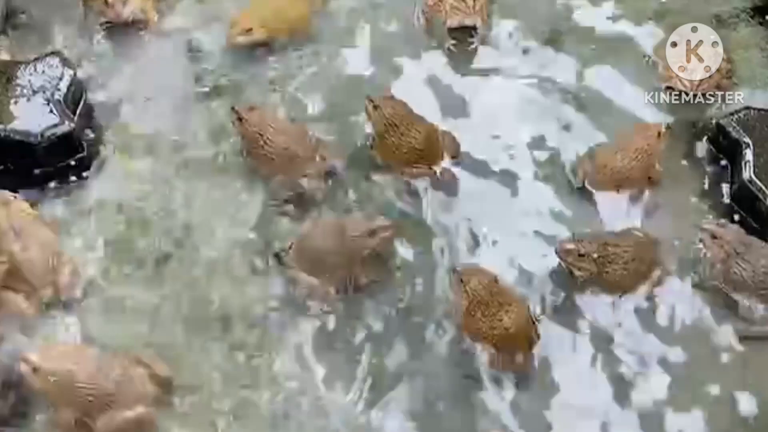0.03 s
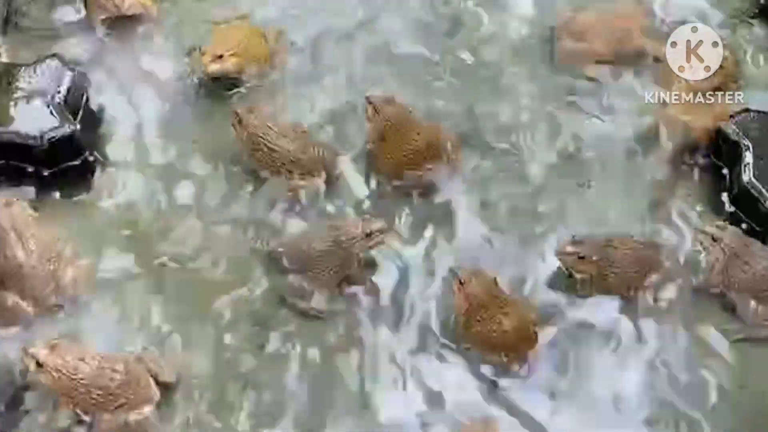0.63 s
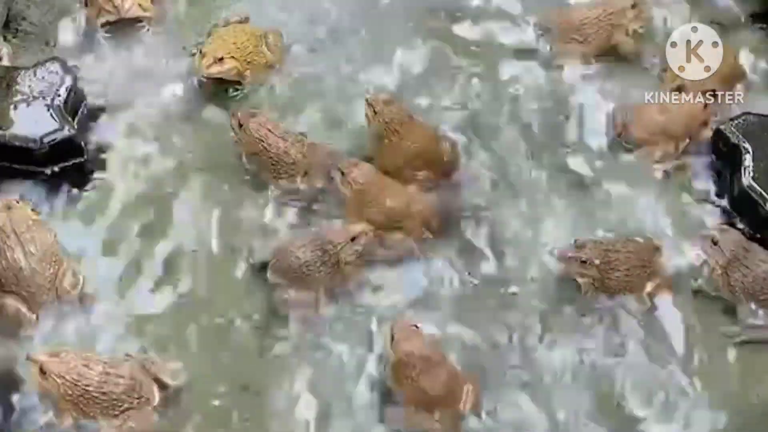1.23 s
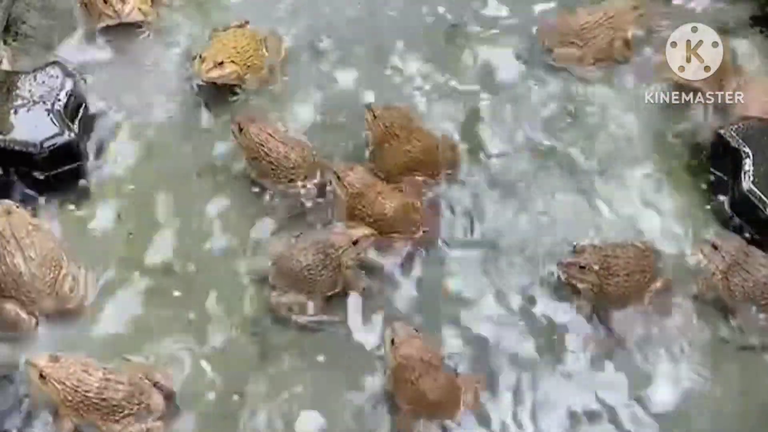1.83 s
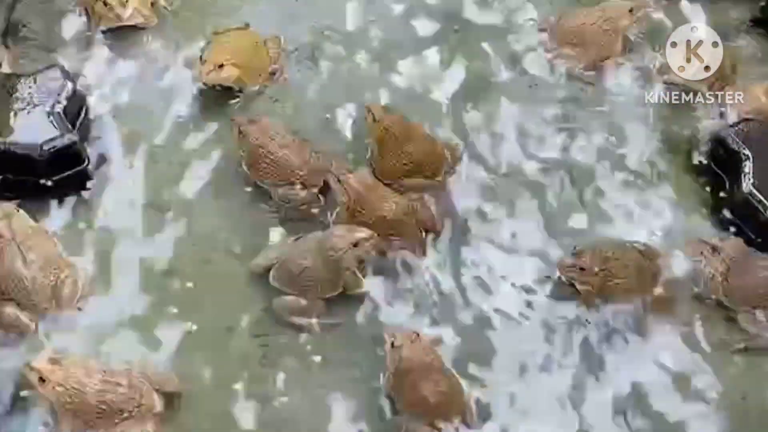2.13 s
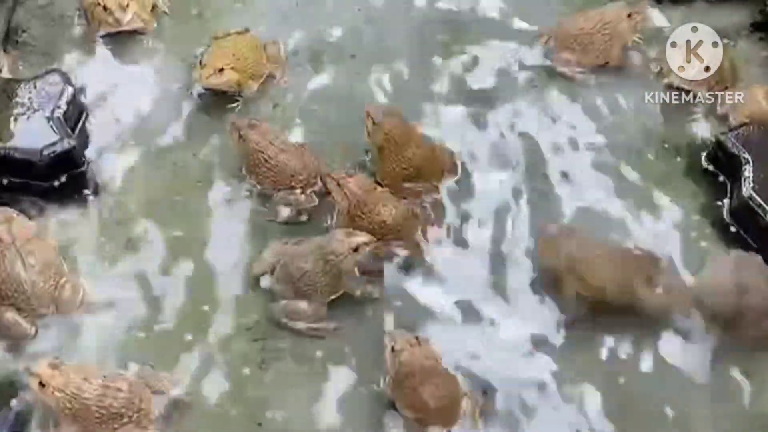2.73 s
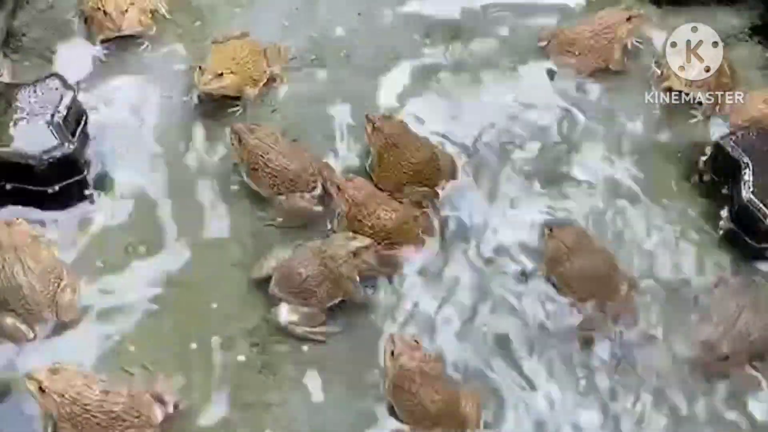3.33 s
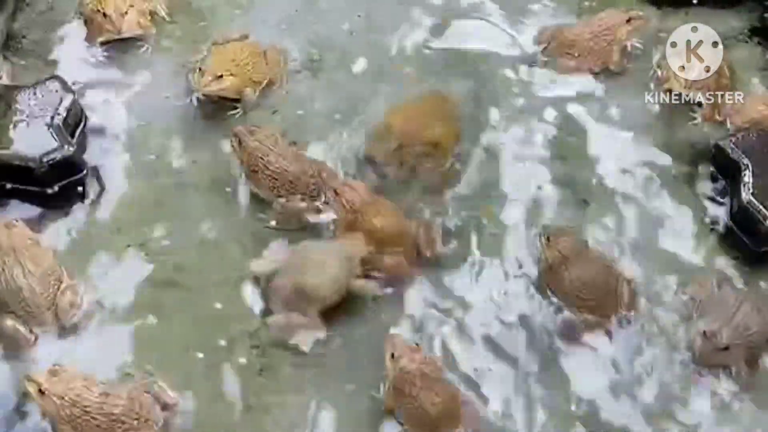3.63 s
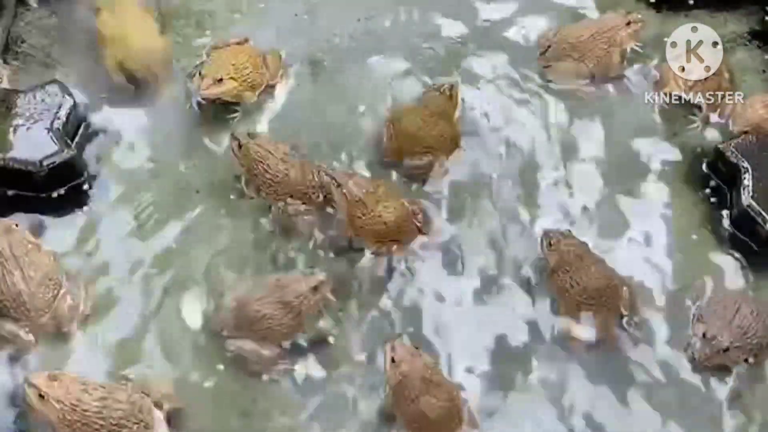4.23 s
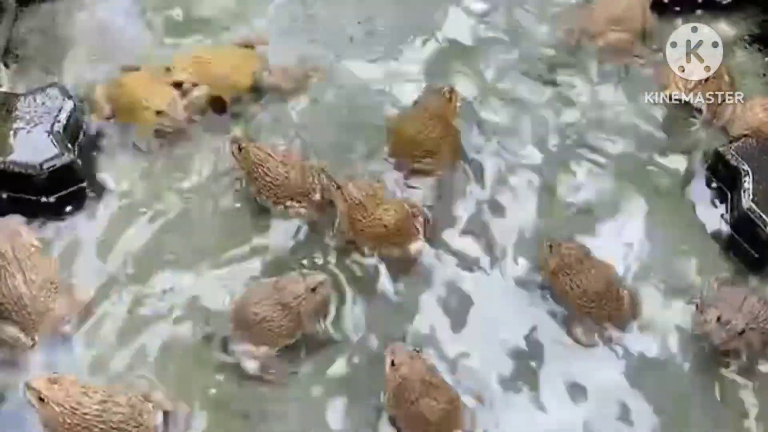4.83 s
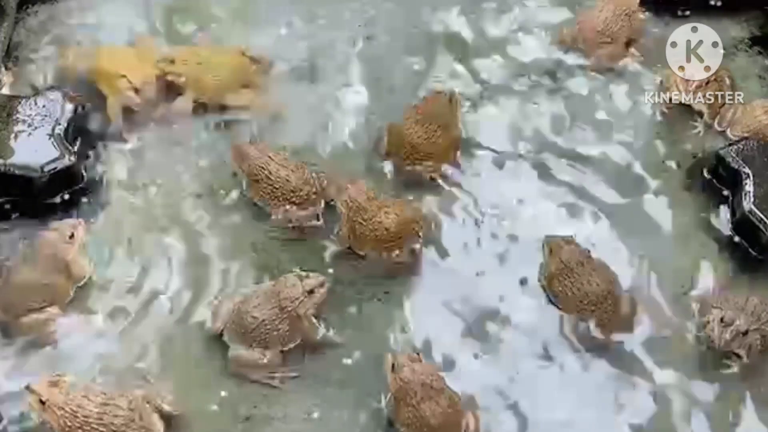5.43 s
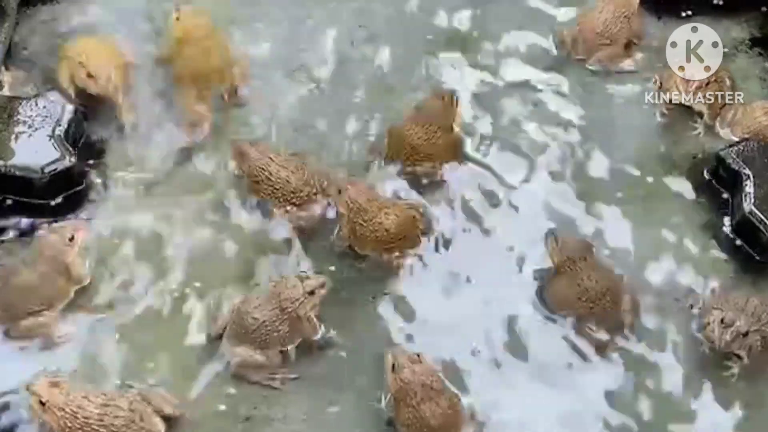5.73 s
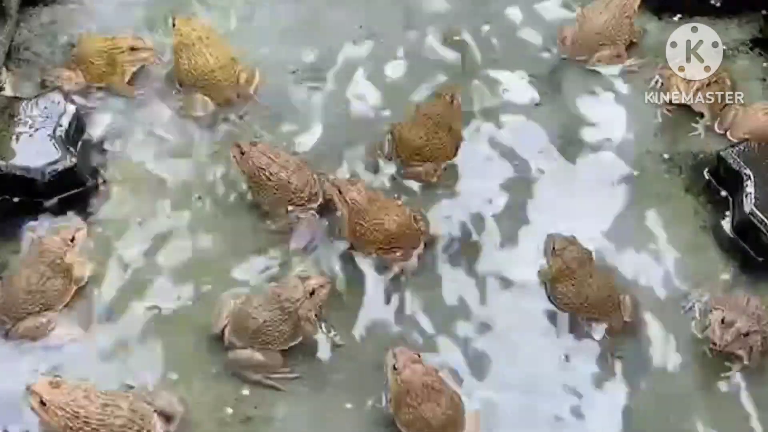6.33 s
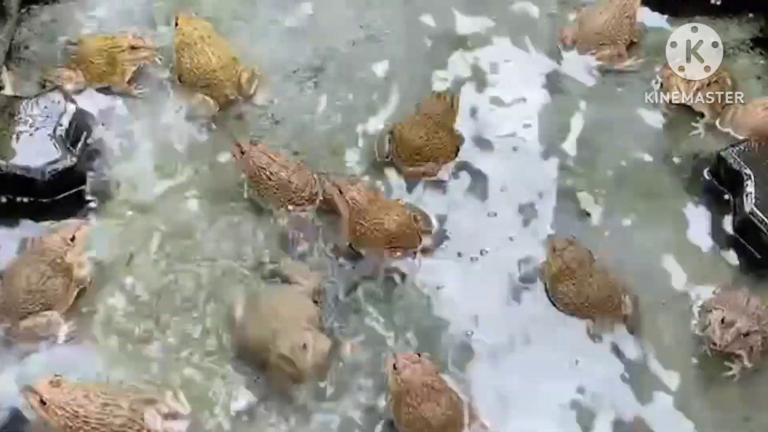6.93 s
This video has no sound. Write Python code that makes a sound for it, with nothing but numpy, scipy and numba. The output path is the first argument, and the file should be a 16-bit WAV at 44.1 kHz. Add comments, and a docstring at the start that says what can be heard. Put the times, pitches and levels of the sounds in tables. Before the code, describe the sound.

Frogs hop and paddle in a shallow pool, making close, uneven splashes with a short echo from the walls. The first second is busy with sloshing, bubbling and bright plinks, with flat belly smacks at about 0.4 and 1.1 seconds. The water eases into trickling, then a sharp plink at 2.3 seconds starts another flurry, peaking near 2.9. More splashes come at 3.7 and from 4.2 to 4.9 seconds. Gentle ripples and small drips follow, until fresh splashing and a brief gurgle between 6.5 and 7 seconds.

Underneath, a low throbbing rumble swells around 1 second, from 2.4 to 3.4 seconds and again at 6. Airy noise and a steady drone fade slightly throughout. A soft, muffled double knock, perhaps from a pump, repeats about every second and a half.

```python
"""Frogs hop and paddle in a shallow walled pool. Each kick or landing stirs up a cloud of
ringing bubbles and fine spray that soon settles. Bellies smack, drops plink, air pockets gulp
and hollows gurgle, and the pool walls add a short echo. Underneath are a low rumble that swells
now and then, airy noise, a steady drone and a soft double knock, perhaps of a pump."""
import sys
import numpy as np
from scipy import signal
from scipy.fft import rfft, irfft
from scipy.io import wavfile
from scipy.ndimage import uniform_filter1d
from numba import njit

SR = 44100
rng = np.random.default_rng(int(sys.argv[2]) if len(sys.argv) > 2 else 0)


def pcm_store(signal):
    """Save signal as 16-bit PCM."""
    levels = np.round(np.clip(np.atleast_2d(signal), -1, 1) * 32767)
    wavfile.write(sys.argv[1], SR, levels.astype(np.int16).T)


N = 311787
T = np.arange(N) / SR
FREQS = np.arange(N // 2 + 1) * SR / N


def amp(db):
    """Turn decibels into a number to multiply by."""
    return 10 ** (np.asarray(db) / 20)


def unit(x):
    """Scale a sound so that its average level (rms) is 1."""
    return x / np.sqrt(np.mean(x ** 2))


def even(x, span_s):
    """Keep the level near 1 over every stretch of span_s seconds."""
    power = uniform_filter1d(np.mean(np.atleast_2d(x) ** 2, axis=0), max(int(span_s * SR), 2))
    return x / np.sqrt(np.abs(power) + 1e-12)


def shape(x, gain):
    """Filter a sound: multiply each frequency by its own gain."""
    return irfft(rfft(x) * gain, N)


def resonance(hz, width_hz):
    """Gains that let through a band of frequencies around one pitch."""
    return 1 / (1 + 1j * (FREQS ** 2 - hz ** 2) / (FREQS * width_hz + 1e-9))


def noise(channels=2):
    """Plain hiss, different in each channel."""
    return rng.standard_normal((channels, N))


def bursts(starts, db, fall_s):
    """A loudness curve that jumps at each start and dies away."""
    out = np.zeros(N)
    for at, size in zip(starts, amp(db)):
        i = int(at * SR)
        out[i:] += size * np.exp(-T[:N - i] / fall_s)
    return out


def surges(starts, db, rise_s, fall_s, hold_s=0):
    """The summed power of events that each build up to their start time, hold and die away."""
    power = np.zeros(N)
    for at, size, fall, hold in np.broadcast(starts, amp(db), fall_s, hold_s):
        span = slice(max(int((at - 6 * rise_s) * SR), 0), int((at + hold + 6 * fall) * SR))
        t = T[span] - at
        power[span] += (size * np.exp(np.minimum(t, 0) / rise_s - np.maximum(t - hold, 0) / fall)) ** 2
    return power


@njit
def ring(start, hz, size, cycles, glide, onset, lag, pan):
    """Tones that swell for `onset` vibrations, fade to 37% in `cycles` and rise in pitch by `glide`."""
    out = np.zeros((2, N))
    for k in range(len(start)):
        life = cycles[k] / hz[k]
        for channel in range(2):
            side = 1 - 2 * channel
            arrival = start[k] - side * lag[k] / 2
            gain = size[k] * (1 + side * pan[k])
            for i in range(max(int(arrival * SR) + 1, 0), min(int((arrival + 5 * life) * SR), N)):
                t = i / SR - arrival
                turns = hz[k] * t * (1 + glide[k] * t / (10 * life))
                swell = 1 - np.exp(-(turns / onset) ** 2)
                out[channel, i] += gain * np.exp(-t / life) * swell * np.sin(2 * np.pi * turns)
    return out


def bubbles(start, hz, size, cycles, glide, onset, spread_s, left):
    """Bubbles ring like tiny bells, each with its own direction and pitch rise."""
    rise, delay, side = rng.uniform(-0.95, 1, (len(start), 3)).T
    lag_s = spread_s * delay  # one ear hears it before the other
    pan = left + 0.053 * side
    return ring(start, hz, size, cycles + np.zeros(len(start)), glide * (1 + rise), onset, lag_s, pan)


# The tone of the air noise. Each row: frequency in Hz, relative level in dB.
AIR_TONE = [(20, -31), (45, 16.5), (150, 1), (400, 5), (650, -10.5), (1200, -19.5), (2100, -14),
            (5500, -35), (12000, -39.5), (15000, -36)]
# Each entry: one pitch of the drone in Hz.
DRONE_PITCHES = [195.7, 220.4, 243.2, 281.6, 348, 373.3, 402]


def air_and_drone(air_db=-42, wide_hz=420, drone_db=-46.5, fade_db=-5):
    """Airy noise, wider in the treble, and a wavering drone; both slowly get quieter."""
    hz, db = np.transpose(AIR_TONE)
    colour = amp(np.interp(np.log(FREQS + 1), np.log(hz), db))
    mid, side = noise()
    width = FREQS / np.hypot(FREQS, wide_hz)
    air = shape(mid, colour) + np.array([[1], [-1]]) * shape(side, colour * width)
    drone = shape(noise() + 2 * noise(channels=1), sum(resonance(f, 6.4) ** 2 for f in DRONE_PITCHES))
    fade = amp(fade_db * (T / T[-1] - .5))
    return (amp(air_db) * unit(air) + amp(drone_db) * unit(drone)) * fade


# The rumble swells. Each row: start and length in seconds, low note and high note levels in dB.
RUMBLE_SWELLS = [(0.912, 0.21, -15.5, -32), (2.375, 0.17, -21, -38.5), (2.537, 0.26, -49, -27.5),
                 (2.916, 0.088, -15, -35.5), (3.17, 0.26, -15.5, -30), (5.29, 0.074, -34, -28),
                 (6.044, 0.26, -20.5, -47)]
# The throb under the swells. Each row: time in seconds, level in dB.
THROB_LEVELS = [(0, -29.5), (2.0, -28), (2.7, -41), (3.6, -29), (4.4, -38.5), (5.0, -32), (5.7, -31.5),
                (7.07, -38.5)]


def rumble(rise_s=0.028, fall_s=0.087, high_rest_db=-39, high_follow=0.41):
    """Two deep notes throb unevenly and swell now and then, the same in both ears."""
    start, length_s, low_db, high_db = np.transpose(RUMBLE_SWELLS)
    throb_db = np.interp(T, *np.transpose(THROB_LEVELS))
    low = even(shape(noise(channels=1), resonance(61.33, 4.85) ** 2), span_s=0.093)
    high = even(shape(noise(channels=1), resonance(106.77, 9.9) ** 2), span_s=0.22)
    throb = even(shape(noise(channels=1), resonance(63.95, 10.6) ** 2), span_s=0.22)
    low_swell = np.sqrt(surges(start, low_db, rise_s, fall_s, length_s))
    high_swell = np.sqrt(surges(start, high_db, rise_s, fall_s, length_s))
    high_rest = amp(high_rest_db + high_follow * (throb_db - throb_db.mean()))
    return throb * amp(throb_db) + low * low_swell + high * np.hypot(high_swell, high_rest)


def knocks(hz=230.0, first_s=0.17, every_s=1.5445, gap_s=0.081, pair_db=(-30, -28)):
    """A muffled pair of knocks comes round at an even pace; each is a short, low ring."""
    first = np.arange(first_s, N / SR, every_s)
    start = np.concatenate([first, first + gap_s])
    size = np.repeat(amp(pair_db), len(first))
    pitch = np.full(len(start), hz)
    return bubbles(start, pitch, size, cycles=5.1, glide=0, onset=0.37, spread_s=0, left=0)


# Runs of bubbles. Each row: start and length in seconds, relative level in dB, first and last pitch in Hz.
BUBBLE_RUNS = [(2.347, 0.013, -24, 2110, 3030), (2.598, .2, -40, 707, 740), (4.244, .06, -24.5, 2590, 1300),
               (4.6, 0.08, -32.5, 656, 1460), (6.606, 0.044, -24.5, 586, 1530),
               (6.876, 0.037, -29, 2190, 2160)]


def gurgles(gain_db=-2, count=20, octaves=0.11):
    """A hollow narrows or opens: the further its pitch slides, the shorter and more varied its bubbles."""
    start, length_s, db, from_hz, to_hz = np.transpose(BUBBLE_RUNS)[:, :, None]
    when, detune = rng.uniform(0, 1, (2, len(BUBBLE_RUNS), count))
    along = (np.arange(count) + when) / count  # 0 to 1 through the run
    unrest = 1 + 2 * np.abs(np.log2(to_hz / from_hz))
    pitch = from_hz * (to_hz / from_hz) ** along * 2 ** (octaves * unrest * (2 * detune - 1))
    size = amp(db + gain_db) * np.sqrt(np.sin(np.pi * along))
    return bubbles((start + length_s * along).ravel(), pitch.ravel(), size.ravel(),
                   cycles=np.repeat(12 / unrest, count), glide=0.033, onset=0.93,
                   spread_s=0.000094, left=0)


# Pockets of air that pinch off under water. Each row: start in seconds, level in dB, pitch in Hz.
AIR_POCKETS = [(0.0464, -24, 2660), (0.275, -21.5, 2210), (0.473, -19, 1920), (0.538, -20, 3550),
               (0.543, -35, 606), (0.5927, -22, 2530), (0.7577, -20, 2440), (0.797, -32, 824),
               (0.837, -19, 4280), (1.0552, -20.5, 1990), (1.062, -24, 540), (1.475, -26.5, 2340),
               (1.636, -26, 2190), (2.436, -29, 823), (2.838, -27, 715), (3.185, -29.5, 2730),
               (3.572, -34.5, 2750), (3.623, -26, 1770), (3.668, -20.5, 549), (3.81, -28.5, 1500),
               (4.1307, -27, 2220), (4.284, -31, 722), (4.343, -18, 2370), (4.522, -23, 2100),
               (4.83, -30.5, 460), (4.892, -23, 2010), (5.172, -30, 3200), (5.43, -29.5, 3120),
               (5.469, -28.5, 2270), (5.732, -37.5, 756), (5.831, -30, 2980), (5.897, -30.5, 834),
               (5.992, -31.5, 3400), (6.066, -31.5, 1790), (6.309, -36.5, 596), (6.509, -22, 2400),
               (6.68, -27.5, 474), (6.957, -28, 572)]


def gulps(count=20, shed_db=-9, shed_gap_s=0.00225, linger_s=0.031):
    """An air pocket breaks with a short plip and sheds a trail of quieter bubbles."""
    start, db, hz = np.transpose(AIR_POCKETS)[:, :, None]
    when, detune = rng.uniform(-0.995, 1, (2, len(AIR_POCKETS), count))
    shed = np.arange(count) > 0  # the first bubble is the pocket itself
    delay = shed * shed_gap_s * (np.arange(count) + when)
    octaves = np.sqrt(hz / 13000)  # small, high pockets scatter more in pitch
    pitch = hz * 2 ** (shed * octaves * detune)
    size = amp(db + shed * shed_db) * np.exp(-delay / linger_s)
    return bubbles((start + delay).ravel(), pitch.ravel(), size.ravel(), cycles=6.5,
                   glide=0.035, onset=0.46, spread_s=0.0001, left=0.24)


# Flicked droplets that trap no bubble. Each row: start in seconds, relative level in dB.
DROPLET_TICKS = [(0.352, -35), (1.213, -36.5), (1.725, -45), (2.49, -38), (2.807, -52), (3.093, -33.5),
                 (3.27, -40.5), (3.6515, -23.5), (3.7815, -57), (4.4227, -27), (4.908, -38.5), (5.291, -50),
                 (5.6, -45), (5.72, -45), (6.915, -41)]


def spatter(start, db, tick_db=4, fallback_db=-10):
    """The first touch is a bright tick; flung droplets fall back in a short hiss."""
    hiss = unit(shape(noise(channels=1), resonance(11300, 3600)))
    tick = bursts(start, db + tick_db, fall_s=0.0062)
    fallback = bursts(start, db + fallback_db, fall_s=0.042)
    return hiss * (tick + fallback)


# Feet and drops that hit the water. Each row: start in seconds, relative level in dB,
# bubble pitch in Hz, spatter in dB compared with that level.
SURFACE_HITS = [(0.405, -20, 3390, -35), (0.4352, -16.5, 2920, -12), (0.9615, -35, 1730, -4.5),
                (1.1888, -35, 3900, 2), (1.8308, -27, 4000, -8.5), (1.844, -35.5, 2320, -14),
                (2.2927, -32, 2410, -19), (2.341, -10, 1993, -26), (2.4349, -26.5, 1960, -11),
                (2.7299, -30.5, 5000, -19), (2.901, -26.5, 2140, -3), (4.1806, -29.5, 4140, -15.5),
                (4.3444, -26, 4300, -31), (4.8267, -30.5, 2900, -14), (6.812, -23, 5360, -12),
                (6.9566, -26, 4330, -24)]


def drops(plink_db=15.5, slap_db=-22, slap_growth=0.48):
    """Each hit slaps the surface, traps one ringing bubble and throws up fine spatter."""
    start, db, hz, spatter_db = np.transpose(SURFACE_HITS)
    plinks = bubbles(start, hz, amp(db + plink_db), cycles=3.27, glide=0.082, onset=1.99,
                     spread_s=0.00009, left=0.26)
    slap = unit(shape(noise() + 2 * noise(channels=1), resonance(2500, 3400) ** 2))
    slap *= bursts(start, db * slap_growth + slap_db, fall_s=0.009)
    return plinks + slap + spatter(start, db + spatter_db)


# Frogs landing flat. Each row: start in seconds, level in dB.
BELLY_LANDINGS = [(0.4038, -21.5), (1.072, -22.5), (2.8392, -27.5), (2.898, -25), (3.671, -27.5),
                  (4.556, -30.5), (5.896, -34), (6.646, -28), (6.811, -34.5)]


def belly_slaps(hz=1500, width_hz=2900, fall_s=0.01):
    """A belly lands flat on the water with a short, full smack."""
    smack = unit(shape(noise() + noise(channels=1), resonance(hz, width_hz) ** 2))
    return smack * bursts(*np.transpose(BELLY_LANDINGS), fall_s)


def cloud(per_s, hz, octaves, cycles, scatter_db, spread_s, left=0):
    """Countless bubbles around one pitch: many faint, a few loud, some ringing longer than others."""
    count = int(per_s * N / SR)
    when, strength, detune, sustain = rng.uniform(0, 1, (count, 4)).T
    pitch = np.clip(hz * 2 ** (octaves * np.arcsin(2 * detune - 1)), 100, .45 * SR)
    size = amp(-scatter_db * np.log(strength + .01)) * np.sqrt(pitch / hz)
    return bubbles(when * N / SR, pitch, size, cycles * 2 ** (2 * sustain - 1),
                   glide=0.086, onset=0.54, spread_s=spread_s, left=left)


def wavelets(per_s=38, range_db=9, fall_s=0.0088, calm=1.4):
    """A loudness curve: little waves break at random, so bubbles come in soft clusters."""
    when, strength = rng.uniform(0, 1, (int(per_s * N / SR), 2)).T
    return even(calm + bursts(when * N / SR, range_db * strength, fall_s), span_s=0.086)


def churn(peak_s, db, settle_s, ripple_db, rise_s=0.024, ripple_db_per_s=-0.05):
    """Bubble level in dB: a leg pushes air under, then the water settles to slowly calming ripples."""
    ripple = amp(ripple_db + ripple_db_per_s * T)
    return 10 * np.log10(surges(peak_s, db, rise_s, settle_s) + ripple ** 2)


# Kicks and landings that churn the water. Each row: time of the peak in seconds, relative levels
# of the small and the large bubbles in dB, settling time in seconds.
FROG_KICKS = [(0.0, -36.5, -35.5, 0.12), (0.15, -46, -54, 0.55), (0.296, -32, -39, 0.063),
              (0.432, -30.5, -34, 0.074), (0.529, -39.5, -39.5, 0.4), (0.766, -36.5, -35, 0.12),
              (1.077, -33, -35, 0.028), (1.376, -40.5, -43, 0.1), (1.67, -45, -44.5, 0.064),
              (1.783, -40.5, -34, 0.012), (1.839, -40, -43, 0.038), (2.015, -45.5, -43, 0.055),
              (2.08, -37, -48, 0.024), (2.304, -37, -37, 0.02), (2.332, -30, -41, 0.042),
              (2.443, -39, -35, 0.1), (2.72, -43, -45, 0.11), (2.837, -33, -31, 0.072),
              (2.898, -32, -32, 0.048), (3.005, -39, -34.5, 0.092), (3.673, -32, -37, 0.069),
              (4.248, -34, -39.5, 0.03), (4.305, -35, -38, 0.15), (4.439, -34, -47, 0.037),
              (4.53, -34.5, -49, 0.038), (4.68, -45, -49, 0.084), (4.84, -41, -36.5, 0.16),
              (5.3, -46.5, -51, 0.18), (5.82, -47.5, -49, 0.12), (5.975, -43, -50, 0.074),
              (6.431, -40, -42, 0.036), (6.49, -43.5, -35, 0.069), (6.66, -34, -34, 0.13),
              (6.839, -41.5, -37, 0.25)]


def paddling():
    """Legs fold air into the water: large bubbles slosh, small ones trickle, hard kicks add spray."""
    peak_s, small_peak_db, large_peak_db, settle_s = np.transpose(FROG_KICKS)
    small_db = churn(peak_s, small_peak_db, settle_s, ripple_db=-53.5)
    large_db = churn(peak_s, large_peak_db, settle_s, ripple_db=-52.5)
    large = cloud(per_s=800, hz=658.8, octaves=0.725, cycles=3.44, scatter_db=3.5, spread_s=0.00083)
    small = cloud(per_s=2800, hz=2243, octaves=0.6, cycles=10.6, scatter_db=3.5, spread_s=0.00016,
                  left=0.17)
    ringing = cloud(per_s=220, hz=2400, octaves=0.7, cycles=20, scatter_db=2.5, spread_s=0.0002)
    spray = cloud(per_s=12000, hz=7125, octaves=0.85, cycles=7.6, scatter_db=3.5, spread_s=0.00002)
    flung = even(spray, span_s=0.1) * wavelets(calm=0.95) + amp(-2.5) * unit(ringing)
    flung *= amp(1.207 * small_db + 5.0)  # grows faster than the trickle as kicks get harder
    slosh = even(large, span_s=0.067) * amp(large_db - 0.5)
    trickle = even(small, span_s=0.02) * wavelets() * amp(small_db - 1.17)
    return slosh + trickle + flung


def pool_walls(x, near_db=-6.5, near_s=0.036, far_db=-9.0, far_s=0.26, dull_hz=4230):
    """Sound bounces between the walls: quick echoes and a weak longer tail, both losing treble."""
    t = np.maximum(T - .003, 0)  # the first echo comes after 3 ms
    echoes = np.zeros((2, N))
    for db, fade_s in ((near_db, near_s), (far_db, far_s)):
        same_energy = np.sqrt(2 * np.log(1000) / (fade_s * SR))  # however long the fade lasts
        echoes += amp(db) * noise() * (t > 0) * amp(-60 * t / fade_s) * same_energy
    return x + shape(x, rfft(echoes) / (1 + 1j * FREQS / dull_hz))


def scene():
    """Splashing within the pool walls, over the low sounds of the place."""
    splashes = paddling() + belly_slaps() + drops() + spatter(*np.transpose(DROPLET_TICKS))
    splashes += gulps() + gurgles()
    return pool_walls(splashes) + rumble() + knocks() + air_and_drone()


# How far left and right are out of step. Each row: frequency in Hz, phase gap in radians.
PHASE_GAPS = [(7600, 0), (8500, -3.0), (9400, -3.3), (10300, -6.1), (12100, -6.5), (12900, -9.2),
              (13800, -9.6), (14700, -12.5)]


def record(dry, top_hz=15500):
    """The two microphone channels slip out of step in the high treble; the very top is cut steeply."""
    hz, radians = np.transpose(PHASE_GAPS)
    turn = np.exp(.5j * np.interp(FREQS, hz, radians) * np.array([[1], [-1]]))
    treble_cut = signal.ellip(8, .2, 70, top_hz, fs=SR, output="sos")
    return signal.sosfilt(treble_cut, shape(dry, turn))


dry = scene()
out = record(dry)
pcm_store(out)
```